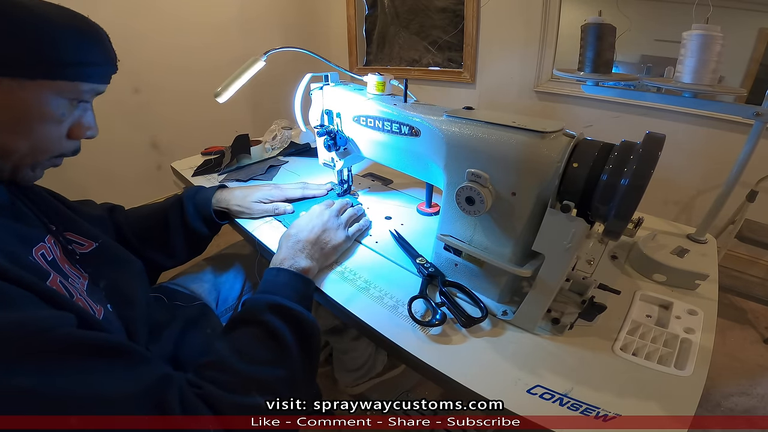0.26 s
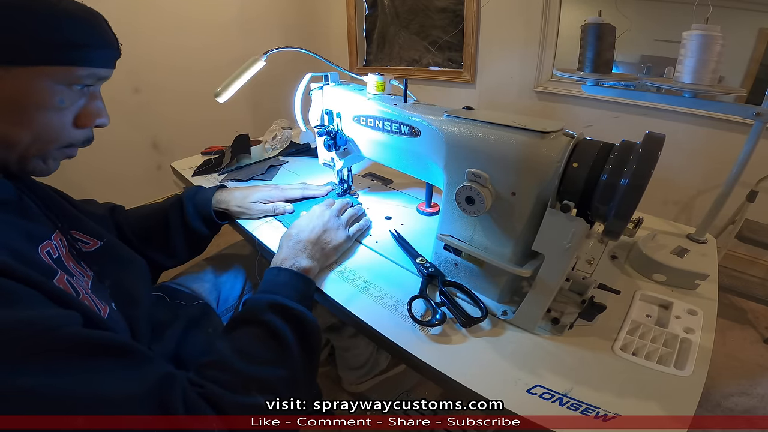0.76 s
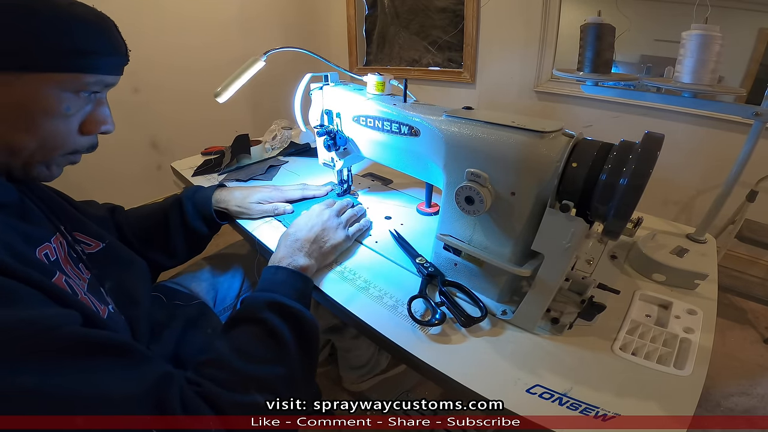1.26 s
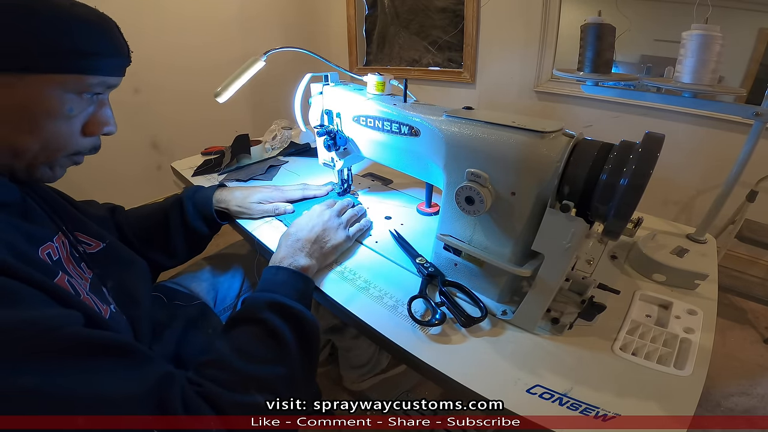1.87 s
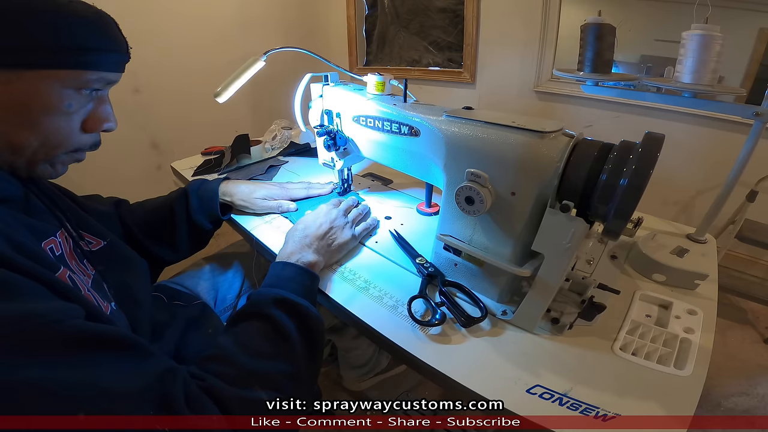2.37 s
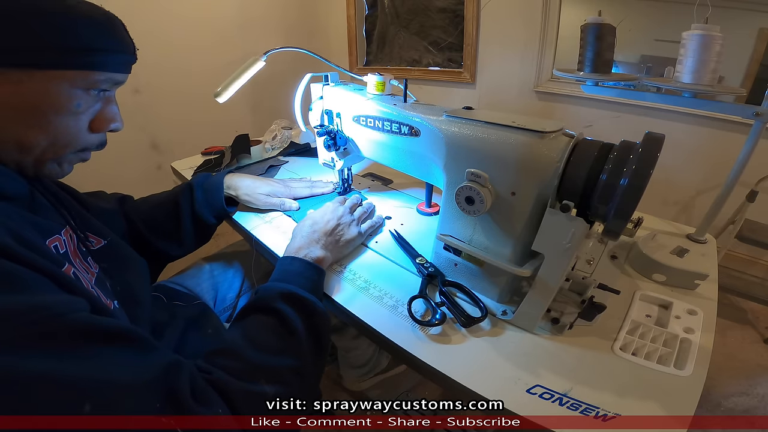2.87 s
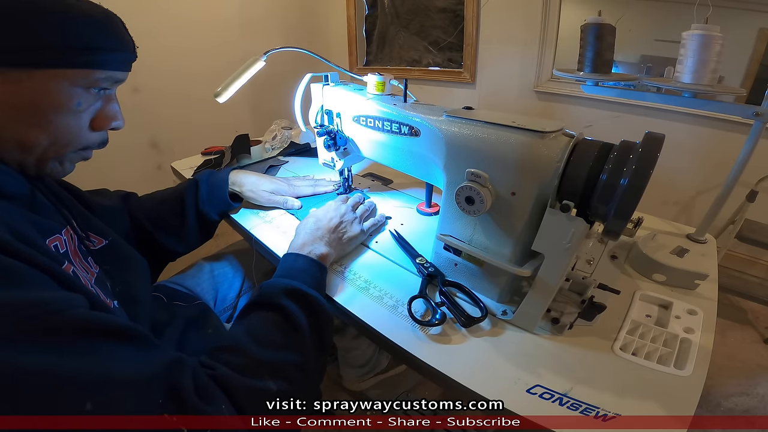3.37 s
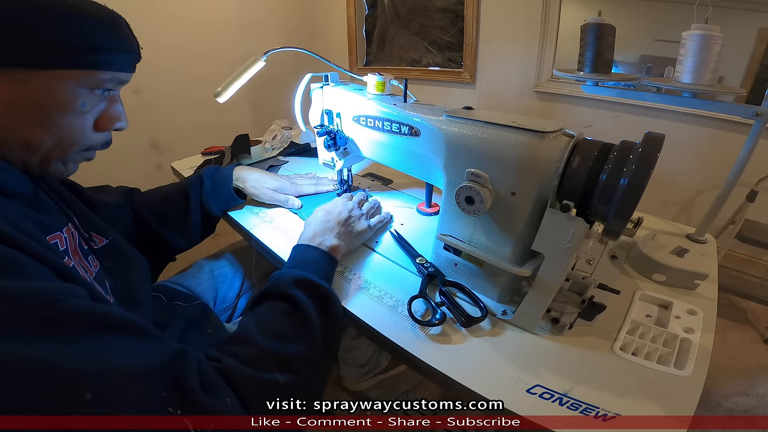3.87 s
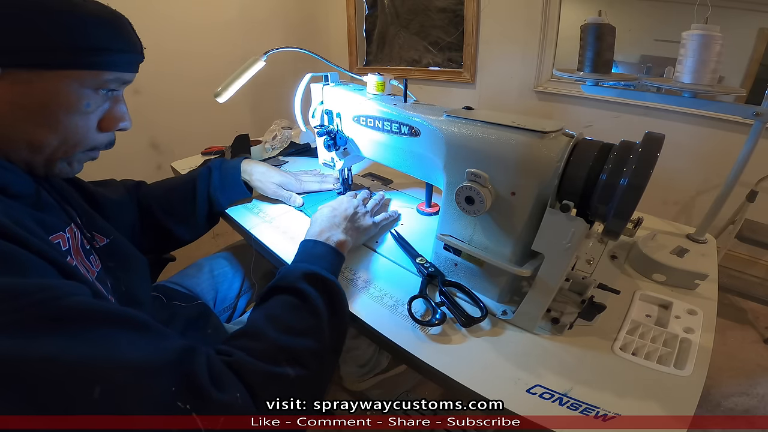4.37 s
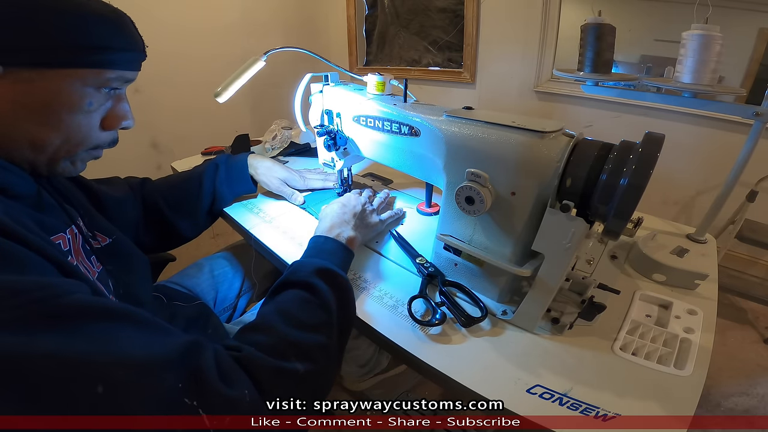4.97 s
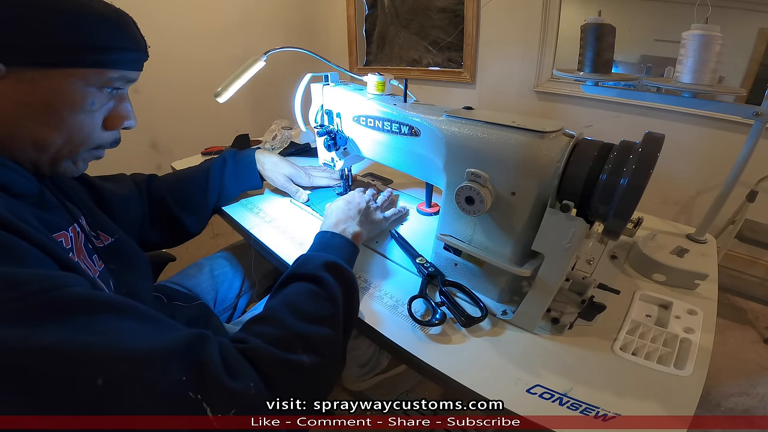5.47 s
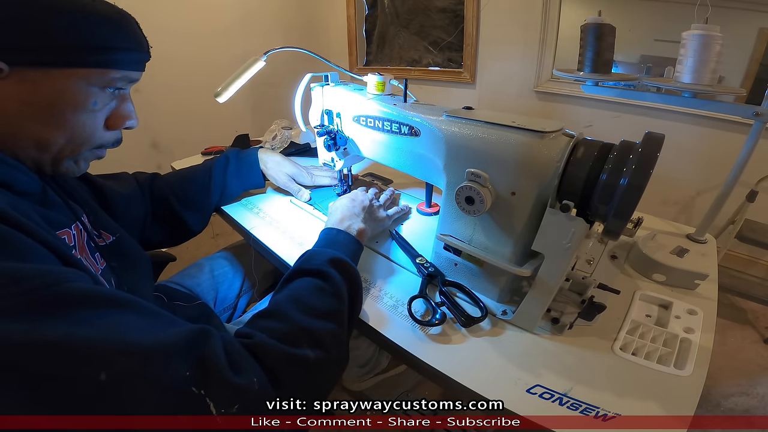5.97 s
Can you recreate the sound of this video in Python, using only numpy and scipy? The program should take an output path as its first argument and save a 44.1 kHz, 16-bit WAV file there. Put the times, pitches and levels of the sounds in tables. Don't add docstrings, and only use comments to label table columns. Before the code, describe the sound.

Dull treadle knocks, a ringing steel click, then a heavy sewing machine stumbles into motion and settles into steady metallic clacking, about three stitches a second.

```python
import sys
import numpy as np
from scipy import signal
from scipy.fft import rfft, irfft, next_fast_len
from scipy.io import wavfile
from scipy.ndimage import map_coordinates

SR = 44100
rng = np.random.default_rng(int(sys.argv[2]) if len(sys.argv) > 2 else 0)


def linear_from_db(decibels):
    return 10 ** (np.asarray(decibels, float) / 20)


def generate_wav(sig):
    pcm = np.round(np.clip(np.atleast_2d(sig).T, -1, 1) * 32767).astype(np.int16)
    wavfile.write(sys.argv[1], SR, pcm)


N = 274743


def stitches():
    hook_rows = np.array(HOOK) + [-.002, -6]
    pull_rows = once_a_turn(.268, -8.5)
    feed_rows = once_a_turn(.299, -5.5)
    lift_rows = once_a_turn(.386, -7.5)
    lever_rows = once_a_turn(.473, -7.5)
    cam_rows = once_a_turn(.775, -10.5)
    play_rows = np.r_[hook_rows + [-.0135, -12], TAKE_UP]
    loads = np.r_[play_rows + [0, -3], pull_rows + [0, -2.5], lever_rows + [0, -2.5], cam_rows + [0, -4]]
    return (hook(hook_rows) + presser_foot() + needle_bar() + cam(play_rows, cam_rows)
            + thread_pull(pull_rows) + feed_dog(feed_rows) + hook_bounce(hook_rows + [.008, -6])
            + lever(lever_rows) + foot_lift(lift_rows) + thread_guide()
            + spring(loads) + thread_rub() + bed_plate(lift_rows))


# (time [s], blow [dB])
HOOK = [(2.1035, -25.5), (2.3232, -27.5), (2.594, -30.5), (3.0993, -28.5), (3.464, -28), (3.8291, -29),
        (4.192, -27.5), (4.5454, -27.5), (4.9008, -27.5), (5.253, -27), (5.6038, -29), (5.9507, -29)]
HOOK_TONE = [-26, -5, -6, -5, -0.5, -5, -7.5]
# (frequency [Hz], width [Hz], level [dB])
HOOK_RING = [(1095, 130, 8.5), (2250, 280, 6), (5960, 1240, -3), (9150, 280, 9.5), (10240, 230, 12),
             (10900, 200, 8), (11740, 400, 6.5)]


def hook(rows):
    return contacts(rows, HOOK_TONE, HOOK_RING, 7.54, 0.0014, 0.042, -10.0, 0.15)


# (time [s], blow [dB])
FOOT = [(2.142, -29), (2.3596, -29), (2.6578, -35), (3.157, -28), (3.5226, -30.5), (3.8897, -29.5),
        (4.2473, -28), (4.602, -29), (4.9538, -27.5), (5.3072, -29), (5.6566, -28), (6.0058, -28)]
FOOT_TONE = [1, 0.5, 1.5, -7.5, -7.5, -14.5, -27]
# (frequency [Hz], width [Hz], level [dB])
FOOT_RING = [(460, 48, 2.3), (1377, 33, 0.61), (1586, 156, 6.6), (2720, 330, 8.5)]


def presser_foot():
    rows = np.array(FOOT) + [-.0012, 0]
    return contacts(rows, FOOT_TONE, FOOT_RING, 8.17, 0.0039, 0.03, -10, 0.12)


# (time [s], blow [dB], thud in the table [dB])
NEEDLE = [(2.2226, -24, -33.5), (2.4665, -29, -35), (2.8476, -32.5, -44), (3.2995, -30, -31.5),
          (3.6606, -29.5, -31.5), (4.0264, -29, -31.5), (4.3848, -30, -33), (4.7403, -29.5, -35.5),
          (5.0946, -29, -37), (5.4485, -29.5, -36), (5.7938, -30, -33), (6.1456, -30.5, -36)]
NEEDLE_TONE = [-1.5, -8, -4.5, -10, -13, -22.5, -24]
# (frequency [Hz], width [Hz], level [dB])
NEEDLE_RING = [(846, 160, 5), (1522, 150, 10.1), (1970, 49, 2.8), (2940, 150, 1.6), (3610, 240, 2.9)]


def needle_bar():
    return contacts(NEEDLE, NEEDLE_TONE, NEEDLE_RING, 13.88, 0.00098, 0.023, -11.5, 0.14)


# (time [s], peak [dB])
TAKE_UP = [
    (2.035, -47),
    (2.049, -38.5),
]
CAM_TONE = [6, -11.5, -0.5, -5.5, -9, -12.5, -16.5]
# (frequency [Hz], width [Hz], level [dB])
CAM_RING = [(980, 13, 1), (1636, 140, 7.9), (2740, 180, 5.6), (10450, 200, 7.6)]


def cam(play_rows, cam_rows):
    return (contacts(play_rows, CAM_TONE, CAM_RING, 14.0, 0.0011, 0.053, -19.5, 0.061)
            + contacts(cam_rows, CAM_TONE, CAM_RING, 8.6, 0.0015, 0.058, -9, 0.065))


PULL_TONE = [-14, -0.5, 3, 2, -9.5, -1, -8]
# (frequency [Hz], width [Hz], level [dB])
PULL_RING = [(1630, 120, 4), (3440, 110, 10.8), (11600, 53, 4.2)]


def thread_pull(rows):
    return contacts(rows, PULL_TONE, PULL_RING, 6.7, 0.0019, 0.052, -8, 0.3)


FEED_TONE = [-45, -18, 7, -8, -1.5, -4.5, -15]
# (frequency [Hz], width [Hz], level [dB])
FEED_RING = [(2343, 500, 7.3), (3540, 18, 1.6), (5380, 260, 6.7), (9000, 39, 3.2), (10100, 100, 3.6)]


def feed_dog(rows):
    return contacts(rows, FEED_TONE, FEED_RING, 5.3, 0.0012, 0.023, -11.5, 0.28)


LEVER_TONE = [-28, -17, -4.5, -2, -11.5, -13.5, -46]
# (frequency [Hz], width [Hz], level [dB])
LEVER_RING = [(410, 11, 25), (2190, 51, 13), (2670, 270, 7.9), (3520, 29, 2.5), (4758, 49, 19)]


def lever(rows):
    return contacts(rows, LEVER_TONE, LEVER_RING, 14.0, 0.0026, 0.021, -15, 0.28)


def hook_bounce(rows):
    return contacts(rows, LEVER_TONE, FEED_RING, 9.8, 0.00029, 0.04, 0, 0.045)


LIFT_TONE = [2, -11, 3, -12, -39, -35, -31]
# (frequency [Hz], width [Hz], level [dB])
LIFT_RING = [(458, 110, 4.2), (896, 170, 6.8), (1226, 67, 1.7)]


def foot_lift(rows):
    return contacts(rows, LIFT_TONE, LIFT_RING, 5.9, 0.001, 0.054, -17.5, 0.13)


# (time [s], peak [dB])
JINGLE = [
    (3.8561, -26),
    (3.8634, -40),
    (3.8684, -32),
    (3.8774, -29),
    (3.8874, -43),
    (4.7496, -31),
]
JINGLE_TONE = [-40, -40, -35, -36, -33, 7.5, -5]


def thread_guide():
    return contacts(JINGLE, JINGLE_TONE, [], -2.5, .0004, .012, -7, 0.054)


def spring(loads):
    tightening_s = np.clip(np.arange(N) / SR - 5.5, 0, None)
    level_db = -9.5 + 3.5 * wobble(76) - 7 * tightening_s
    return linear_from_db(level_db) * strikes(loads, burst(SR // 2, 0.0017, .22)) * narrow(8010, 180)


def thread_rub():
    rows = np.array(FOOT) + [.015, 0]
    return linear_from_db(-13) * strikes(rows, burst(SR // 4, 0.031, 0.072)) * narrow(1440, 200)


def bed_plate(lift_rows):
    return linear_from_db(-14) * strikes(lift_rows, burst(SR // 2, 0.0017, 0.48)) * narrow(417, 21)


# (frequency [Hz], level [dB], t60 [s])
TABLE_TOP = [(68.6, -1, 0.4), (107.5, 1.5, 0.26), (165.4, 1.5, 0.41), (183.4, -5, 0.29), (239.5, -7, 0.33)]


def thuds():
    out = np.zeros(N + SR)
    t = np.arange(SR // 2) / SR
    times = once_a_turn(.575, 0)[:, 0]
    luck_db = rng.standard_normal((len(NEEDLE), len(TABLE_TOP)))
    for s, db, luck in zip(times, np.array(NEEDLE)[:, 2], luck_db):
        ring = sum(linear_from_db(level + u - 60 * t / t60) * np.sin(2 * np.pi * hz * t)
                   for (hz, level, t60), u in zip(TABLE_TOP, luck))
        out[round((s + .004) * SR):][:len(t)] += linear_from_db(db - 4.5) * ring * (1 - np.exp(-t / 0.0043))
    return out[:N]


# (time [s], level [dB])
EFFORT = [(1.9, -63), (1.96, -63), (2.1, -41), (2.24, -33.5), (2.36, -38.5), (2.5, -38.5), (2.7, -43.5),
          (2.86, -47), (3.0, -54), (3.12, -44), (4.2, -44.5), (5.1, -43), (6.23, -44)]
# (place in the turn [0-1], sliding [dB], table buzz [dB], belt [dB])
LOAD = [(0, 1, -1.5, -32.5), (.16, 0, -0.5, 0), (.3, -2, -14, -7), (.46, 3, -7.5, -6), (.62, 2, -1, -4.5),
        (.85, -2, -1.5, -12), (1, -2.5, -12, -4)]
# (frequency [Hz], level [dB per Hz])
SLIDE = [(120, -36), (200, -3), (278, -3), (416, -6.5), (659, -7.5), (1560, -2.5), (4120, -10),
         (7970, -14.5), (12200, -15.5), (16000, -36)]
# (frequency [Hz], width [Hz], level [dB])
HEAD = [(417, 39, -11), (3240, 81, 0)]


def drive():
    effort_db, = curves(EFFORT)
    place, *load = np.transpose(LOAD)
    turn = np.interp(np.arange(N) / SR, *shaft()) % 1
    slide_db, buzz_db, belt_db = [np.interp(turn, place, db) for db in load]
    swing_db = effort_db - EFFORT[-1][1]
    on = np.clip((np.arange(N) / SR - 1.93) / 0.096, 0, 1)
    grit = rng.standard_normal(N) * linear_from_db(2.6 * wobble(300))
    slide = unit(filtered(grit, lambda hz: linear_from_db(along(SLIDE, hz)) * ringing(hz, HEAD) ** .5))
    buzz = narrow(159.0, 39) + 1.33 * narrow(117.5, 37)
    belt = narrow(416.5, 120)
    return on * (linear_from_db(effort_db + slide_db - 4.0) * slide
                 + linear_from_db(0.45 * swing_db + buzz_db - 51) * buzz
                 + linear_from_db(0.52 * swing_db + belt_db - 49.5) * belt)


# (time [s], peak [dB])
LATCH = [
    (1.161, -35),
    (1.171, -21.5),
    (1.183, -20),
    (1.194, -29),
]
# (frequency [Hz], level [dB], t60 [s])
STEEL = [(860, -9, 0.48), (1315, -12, 0.45), (2095, -11.5, 0.27), (2290, -18.5, 0.9), (2870, -8.5, 0.4),
         (3960, -5, 0.3), (5710, -6.5, 0.27), (6691, -13.5, 0.45), (7671, -23, 0.12), (8540, -31, 0.4),
         (8899, -27, 0.28), (9265, -15, 0.14), (10100, -1, 0.12), (11940, -24, 0.18)]
# (frequency [Hz], level [dB per Hz])
SNAP = [(120, -57), (200, -43), (387, -5), (519, -18), (860, -0.5), (1870, -16.5), (3900, -9),
        (4270, -18.5), (10100, -17.5), (16000, -33)]


def latch():
    ring, crack = np.zeros(N), np.zeros(N)
    t = np.arange(SR // 2) / SR
    for s, db in LATCH:
        tones = sum(linear_from_db(level - 60 * t / t60) * wobble(263.4, size=len(t)) * np.sin(2 * np.pi * hz * t)
                    for hz, level, t60 in STEEL)
        noise = burst(len(t), 0.00087, 0.12) * rng.standard_normal(len(t))
        ring[round(s * SR):][:len(t)] += linear_from_db(db - 19.5) * tones * (1 - np.exp(-t / 0.0015))
        crack[round(s * SR):][:len(t)] += linear_from_db(db + 3.0) * noise
    return ring + causal(crack, lambda hz: linear_from_db(along(SNAP, hz)))


# (time [s], peak [dB], t60 [s], brightness
# [dB per octave])
TREADLE = [(0.313, -51, 0.13, -3), (0.486, -52, 0.058, -4), (0.526, -41.5, 0.12, -2.2),
           (0.599, -52, 0.085, 2), (0.761, -45.5, 0.27, 1), (0.793, -37.5, 0.09, 1.5),
           (0.809, -42, 0.24, 2), (1.938, -49, 0.07, 2.5), (1.959, -48, 0.12, 0)]
# (frequency [Hz], level [dB per Hz])
CREAK = [(100, -0.5), (260, -14), (320, -3), (471, -12.5), (750, -17.5), (1300, -24.5), (3000, -33.5),
         (10700, -48), (16000, -57)]


def treadle():
    out, size = np.zeros(N), SR // 2
    for s, db, t60, bright_db in TREADLE:
        gain = lambda hz: linear_from_db(along(CREAK, hz) + bright_db * np.log2(np.clip(hz, 100, None) / 400))
        knock = burst(size, 0.00087, t60) * rng.standard_normal(size)
        out[round(s * SR):][:size] += linear_from_db(db + 26.0) * causal(knock, gain)
    return out


# (time [s], level [dB])
BUMPS = [
    (.3, -46),
    (.78, -44),
    (1.17, -50),
    (2.02, -36.5),
]


def jolts():
    return strikes(BUMPS, burst(SR // 2, 0.0079, 0.38)) * narrow(145, 31)


# (frequency [Hz], t60 [s])
WALLS = [(150, 0.22), (1000, 0.39), (4000, 0.45), (12000, 0.34)]


def room(x):
    hz, t, z = signal.stft(rng.standard_normal(SR // 2), SR, nperseg=256)
    tail = signal.istft(z * linear_from_db(-60 * t / along(WALLS, hz)[:, None]), SR, nperseg=256)[1]
    return signal.fftconvolve(np.pad(x, (250, 0)), tail / np.linalg.norm(tail))[:N]


# (time [s], level [dB])
SWAY_KICKS = [(.12, -30), (.5, -26), (.67, -32), (.84, -25.5), (1.22, -31), (1.38, -32), (1.59, -29.5),
              (2.09, -38)]


def stand_sway():
    running = np.clip(np.arange(N) / SR - EFFORT[0][0], 0, 1)
    sway_db = -38 - 0.5 * running + 3.8 * wobble(7.5)
    return (linear_from_db(sway_db) + strikes(SWAY_KICKS, burst(SR // 2, 0.009, 0.43))) * swaying(13.0, 0.31, 3.0)


# (time [s], level [dB])
TREMBLE = [(0.0, -35.5), (0.36, -63), (0.55, -38), (0.83, -32.5), (0.9, -27.5), (1.09, -53), (2.13, -37),
           (2.17, -40), (2.51, -37), (2.57, -61), (2.81, -35), (2.98, -53), (3.11, -40), (4.42, -39.5),
           (5.45, -31), (5.57, -47), (6.0, -32.5), (6.23, -37)]


def floor_rumble():
    rumble_db, = curves(TREMBLE)
    return linear_from_db(rumble_db - 1.1 + 2.4 * wobble(23)) * swaying(27, 0.1113, 7.3)


# (time [s], level [dB])
HUM_KICKS = [(.5, -51), (.76, -37.5), (1.02, -40), (1.5, -49), (1.98, -42), (2.2, -34.5), (4.55, -49),
             (4.9, -49)]


def board_hum():
    kicks = np.r_[HUM_KICKS, np.array(NEEDLE)[:, [0, 2]] + [0, -14]]
    hum = linear_from_db(-55 + 2.9 * wobble(7)) + strikes(kicks, burst(SR // 2, 0.041, 0.67))
    return hum * swaying(70, 0.0604, 18)


# (frequency [Hz], level [dB per Hz])
AIR = [(24, -51), (40, -5), (81, -9), (176, -17), (204, -22), (297, -22.5), (422, -33), (455, -31.5),
       (542, -33), (1590, -37), (4240, -42), (16000, -46.5)]


def air():
    noise = unit(filtered(rng.standard_normal(N), lambda hz: linear_from_db(along(AIR, hz)) * (hz > 38)))
    return linear_from_db(-52 + 0.4 * wobble(4.68)) * noise


def shaft():
    marks = np.array([[row[0] for row in rows] for rows in (HOOK, FOOT, NEEDLE)])
    turns = np.arange(len(HOOK)) + np.array([[0], [.155], [.55]])
    turn_s = .348
    first = [[HOOK[0][0] - turn_s], [-1]]
    last = [[HOOK[-1][0] + turn_s], [len(HOOK)]]
    return np.c_[first, [marks.T.ravel(), turns.T.ravel()], last]


def once_a_turn(turn, db):
    s, turns = shaft()
    force_db = (np.array(FOOT)[:, 1] + np.array(NEEDLE)[:, 1]) / 2
    when = np.interp(np.arange(len(HOOK)) + turn, turns, s)
    effort_db = np.interp(when, *np.transpose(EFFORT))
    stall_db = 2.5 * np.minimum(effort_db + 48, 0)
    scatter_db = 1.5 * rng.standard_normal(len(HOOK))
    rows = np.c_[when, force_db + stall_db + db + scatter_db]
    return rows[rows[:, 0] < N / SR - .005]


COLOUR_HZ = [300, 600, 1200, 2400, 5000, 10000, 15000]


def contacts(rows, tone_db, modes, db, rise, t60, rattle_db, rattle_t60):
    touch = linear_from_db(7.5) * burst(SR // 4, 0.00023, 0.0032)
    crack = strikes(rows, burst(SR // 4, rise, t60) + touch) * (2 * rng.integers(0, 2, N) - 1)
    grit = rng.standard_normal(N)
    spiky = grit * (0.53 + 1.57 * (abs(grit) > 2.4))
    chatter = spiky * linear_from_db(2.66 * wobble(150))
    rattle = strikes(rows, burst(SR // 4, 0.0057, rattle_t60)) * chatter
    colour = np.transpose([[72, *COLOUR_HZ], [-68.0, *tone_db]])
    gain = lambda hz: linear_from_db(along(colour, hz)) * abs(ringing(hz, modes))
    return linear_from_db(db - 3.0) * causal(crack + linear_from_db(rattle_db + 3) * rattle, gain)


def strikes(rows, shape):
    rows = np.array(rows)
    blows = np.zeros(N)
    blows[np.round((rows[:, 0] + .0015) * SR).astype(int)] = linear_from_db(rows[:, 1])
    return signal.oaconvolve(blows, shape)[:N]


def burst(length, rise, t60):
    t = np.arange(length) / SR
    return (1 - np.exp(-t / max(rise, 1e-4))) * linear_from_db(-60 * t / max(t60, .003))


def ringing(hz, modes):
    return 1 + sum(linear_from_db(db) * 1j * hz * w / (c * c - hz * hz + 1j * hz * w) for c, w, db in modes)


def narrow(hz, width_hz):
    resonance = lambda f: (f * width_hz / (hz * hz - f * f + 1j * f * width_hz)) ** 2
    return unit(filtered(rng.standard_normal(N), resonance))


def swaying(hz, wander, rate):
    return np.sqrt(2) * np.cos(2 * np.pi * np.cumsum(hz * (1 + wander * wobble(rate))) / SR)


def wobble(rate, size=N):
    knots = rng.standard_normal(int(size * rate / SR) + 4)
    return map_coordinates(knots, [np.arange(size) * rate / SR])


def filtered(x, response):
    m = next_fast_len(N + SR // 2)
    return irfft(rfft(x, m) * response(np.fft.rfftfreq(m, 1 / SR)), m)[:N]


def causal(x, gain):
    c = irfft(np.log(gain(np.fft.rfftfreq(4096, 1 / SR)) + 1e-6))
    c[1:len(c) // 2] *= 2
    c[len(c) // 2 + 1:] = 0
    return signal.oaconvolve(x, irfft(np.exp(rfft(c))))[:len(x)]


def along(points, hz):
    f, v = np.transpose(points)
    return np.interp(np.log(hz + 1), np.log(f + 1), v)


def curves(rows):
    s, *cols = np.transpose(rows)
    return [np.interp(np.arange(N) / SR, s, c) for c in cols]


def unit(x):
    return x / np.sqrt(np.mean(x ** 2) + 1e-20)


def scene():
    near = stitches() + treadle() + latch()
    background = stand_sway() + floor_rumble() + board_hum() + air()
    mono = near + linear_from_db(-5) * room(near) + thuds() + jolts() + drive() + background
    return np.array([mono, mono])


def low_pass(x):
    return signal.sosfilt(signal.butter(12, 16340, fs=SR, output="sos"), x)


def record(dry):
    mid = filtered(dry[0], lambda hz: hz < 15800)
    hz, _, z = signal.stft(mid, SR, nperseg=512)
    trace_db = along([(60, -70), (170, -46), (400, -32.5), (1300, -33), (3000, -26), (6000, -23.5),
                      (14000, -19)], hz)
    trace = z * linear_from_db(trace_db)[:, None]
    side = signal.istft(trace * np.exp(2j * np.pi * rng.random(z.shape)), SR, nperseg=512)[1][:N]
    return low_pass(np.array([mid + side, mid - side]))


dry = scene()
out = record(dry)
generate_wav(out)
```